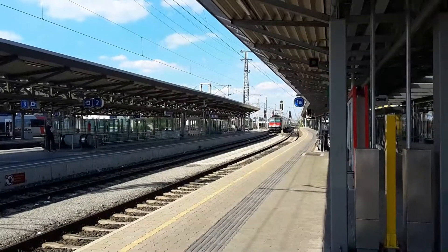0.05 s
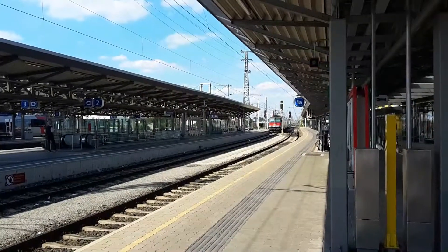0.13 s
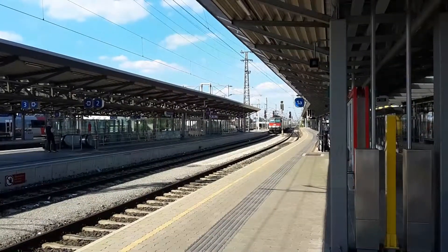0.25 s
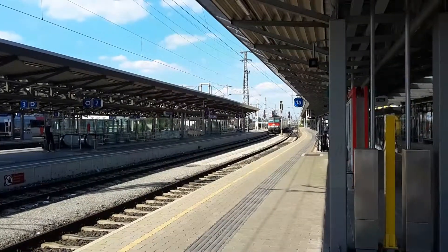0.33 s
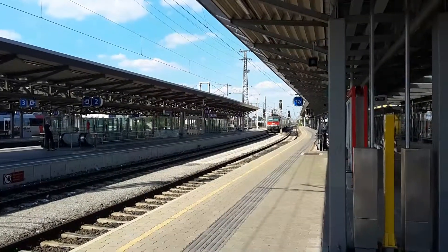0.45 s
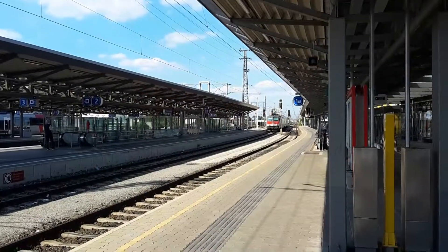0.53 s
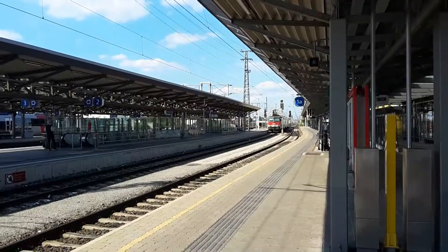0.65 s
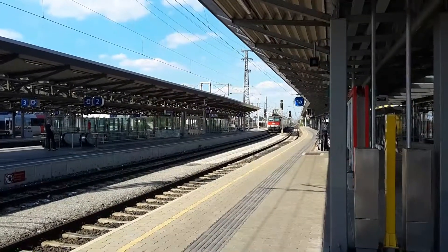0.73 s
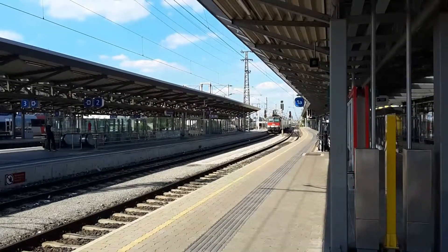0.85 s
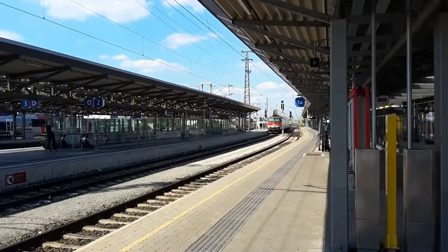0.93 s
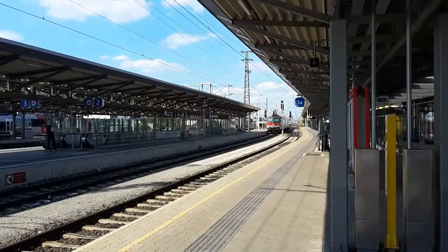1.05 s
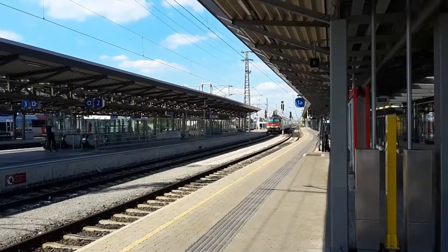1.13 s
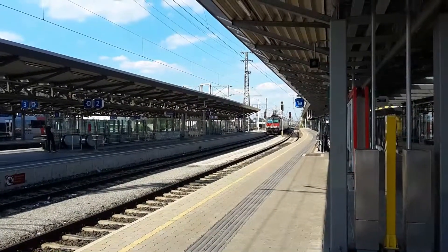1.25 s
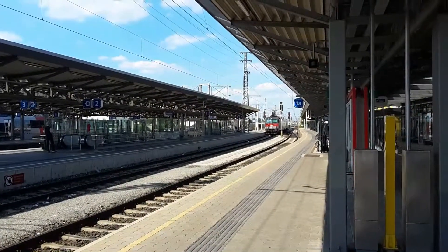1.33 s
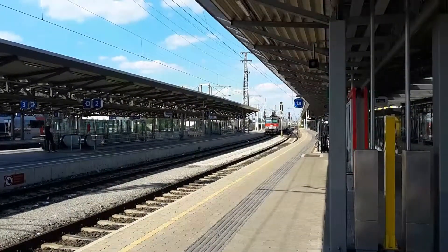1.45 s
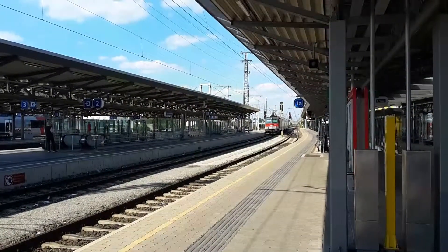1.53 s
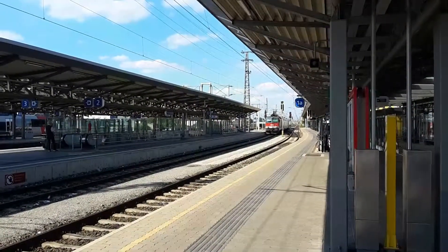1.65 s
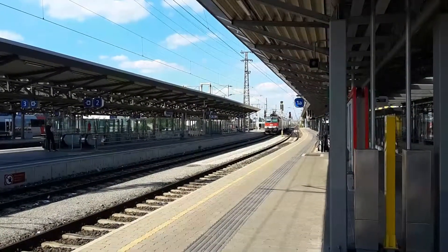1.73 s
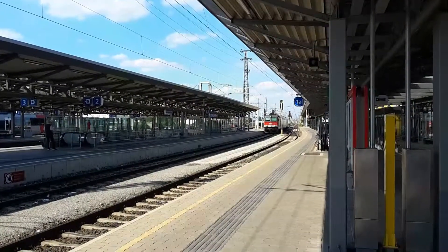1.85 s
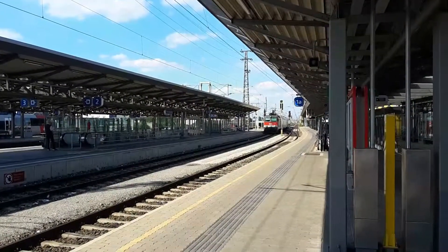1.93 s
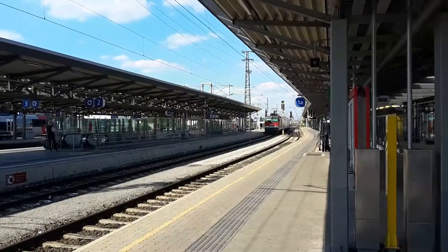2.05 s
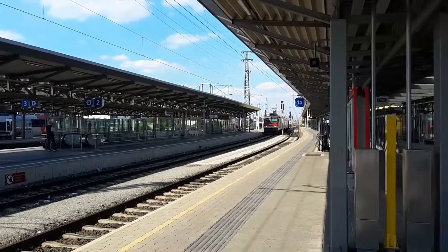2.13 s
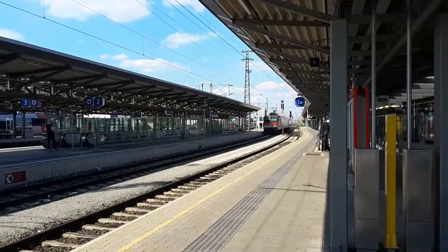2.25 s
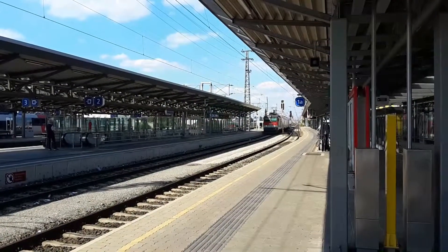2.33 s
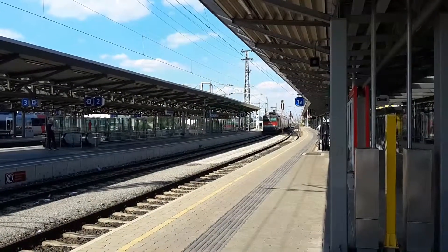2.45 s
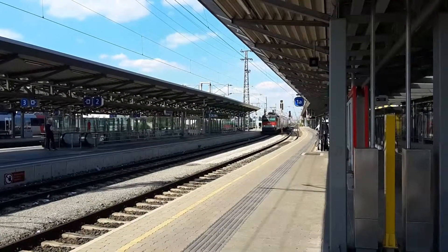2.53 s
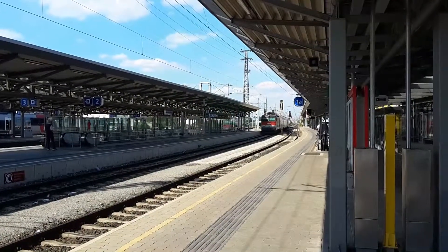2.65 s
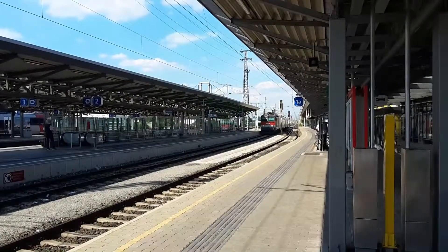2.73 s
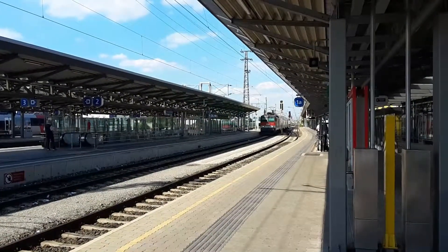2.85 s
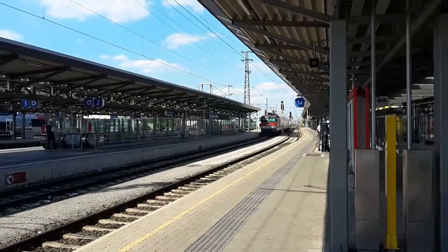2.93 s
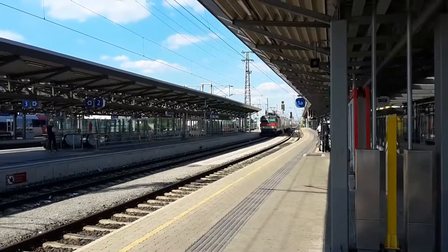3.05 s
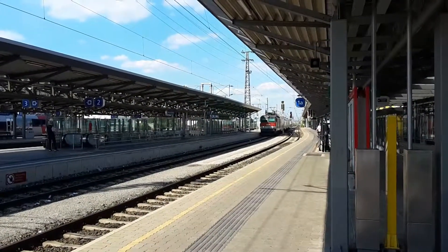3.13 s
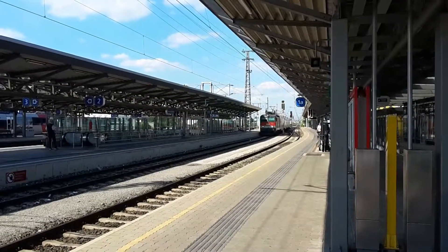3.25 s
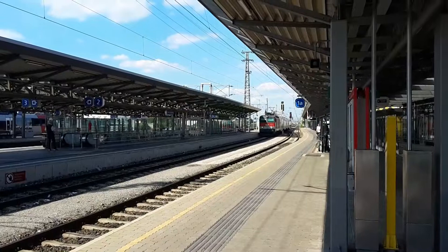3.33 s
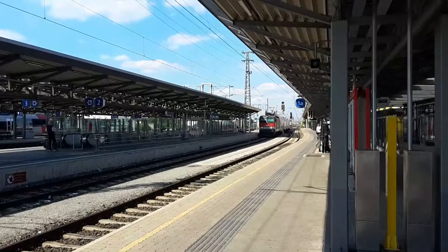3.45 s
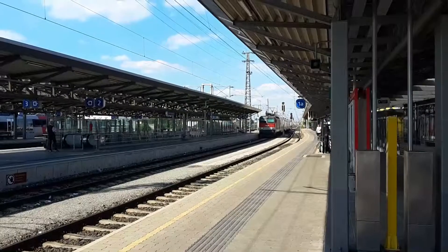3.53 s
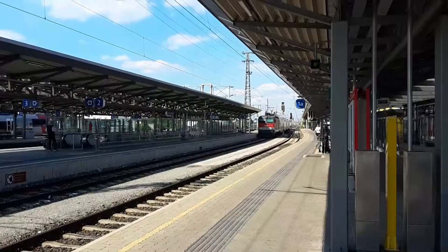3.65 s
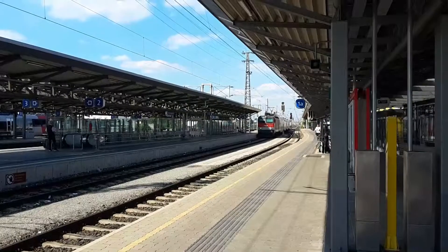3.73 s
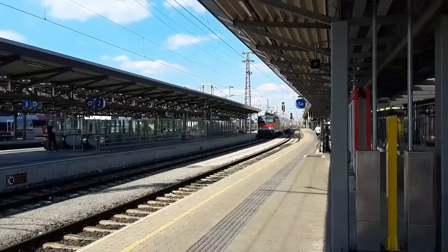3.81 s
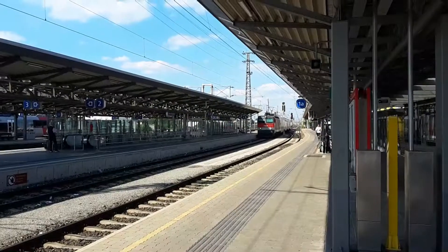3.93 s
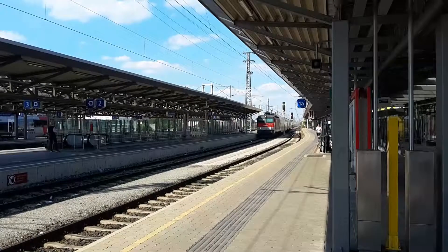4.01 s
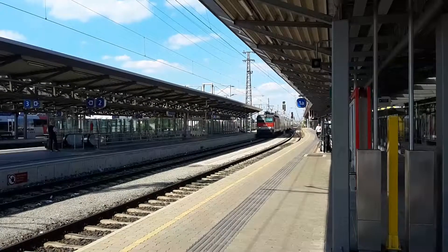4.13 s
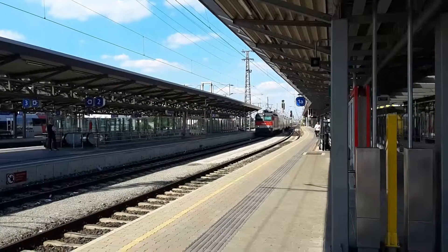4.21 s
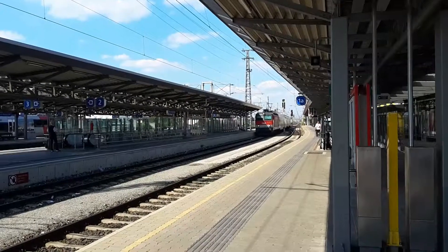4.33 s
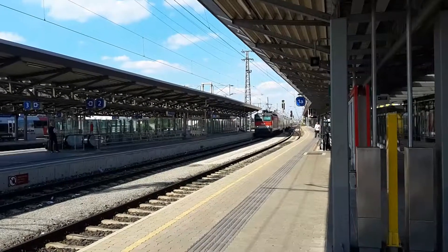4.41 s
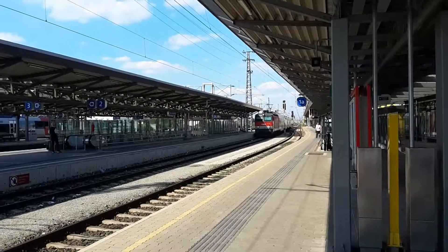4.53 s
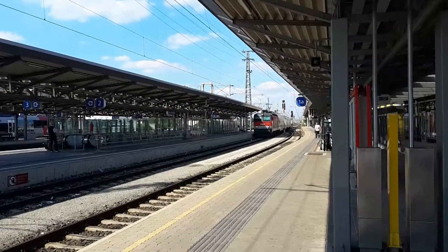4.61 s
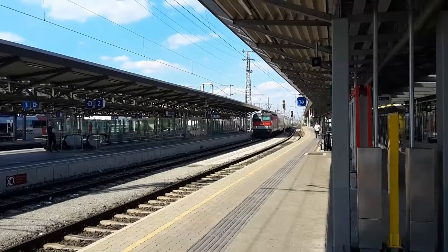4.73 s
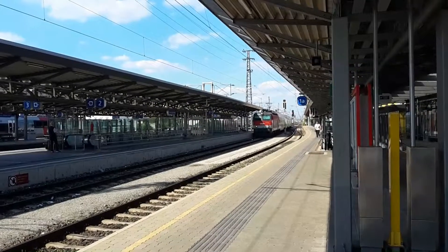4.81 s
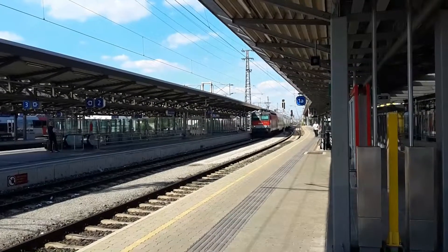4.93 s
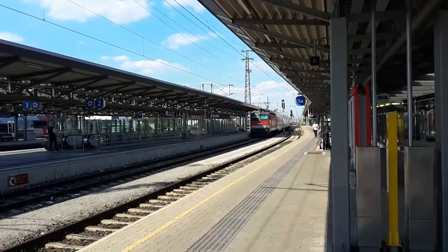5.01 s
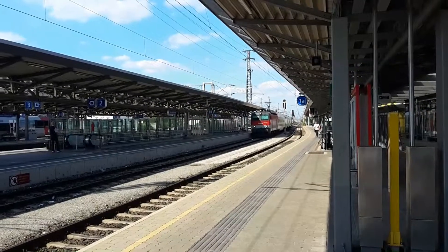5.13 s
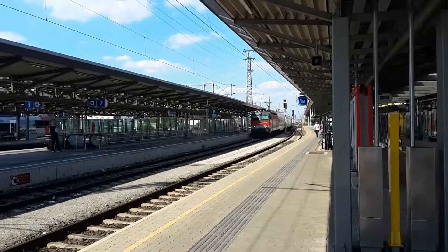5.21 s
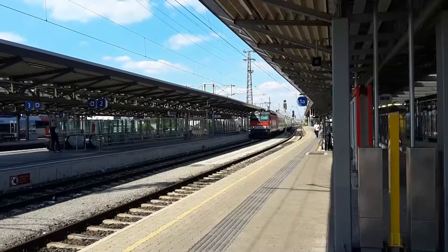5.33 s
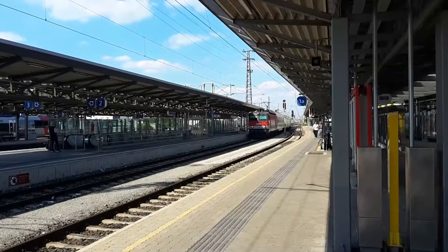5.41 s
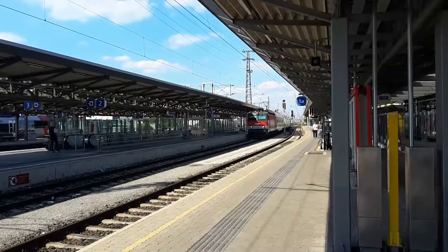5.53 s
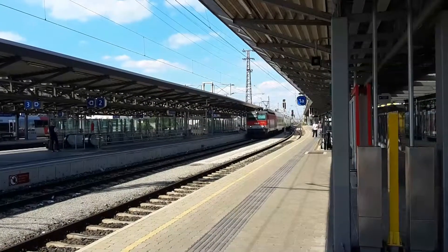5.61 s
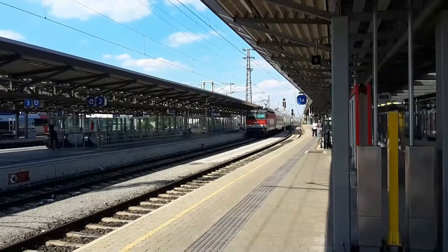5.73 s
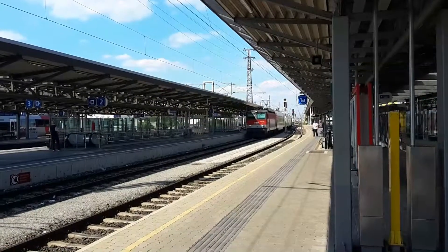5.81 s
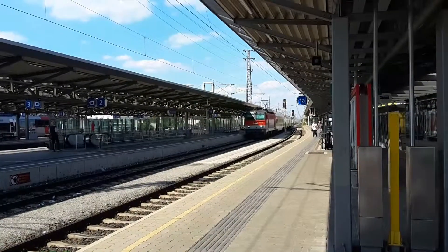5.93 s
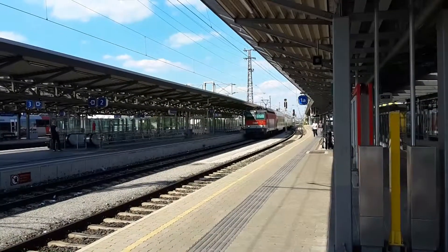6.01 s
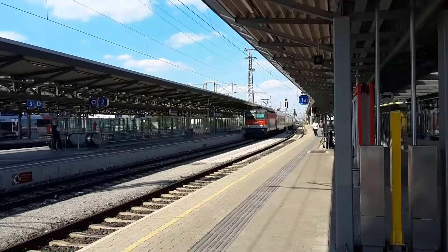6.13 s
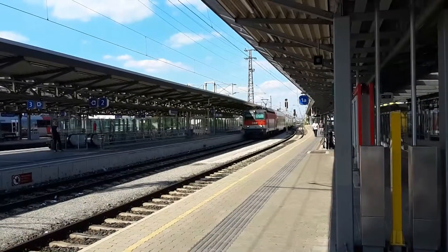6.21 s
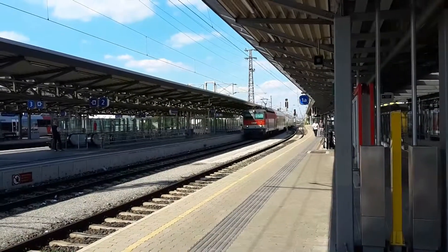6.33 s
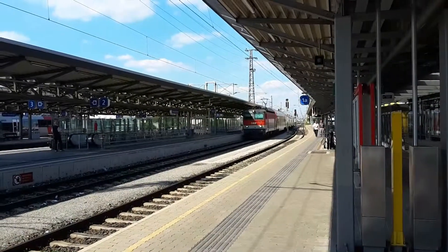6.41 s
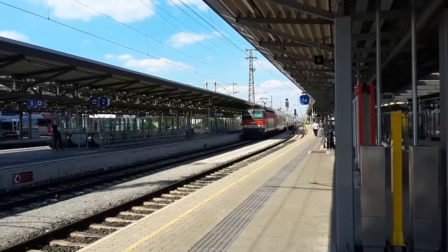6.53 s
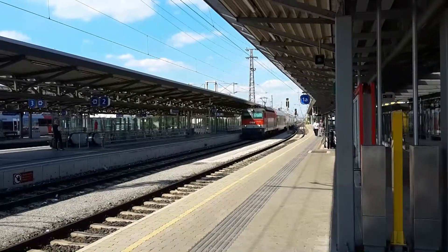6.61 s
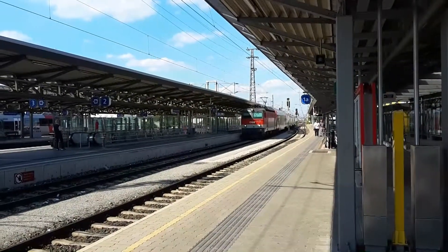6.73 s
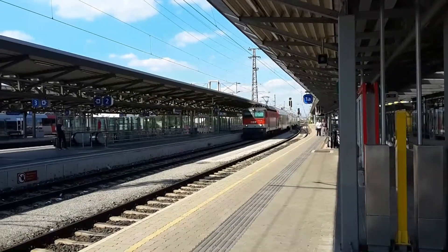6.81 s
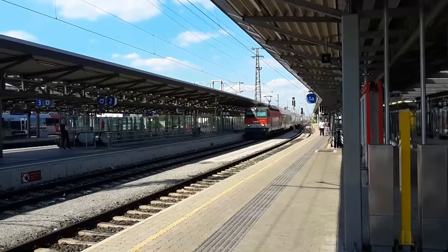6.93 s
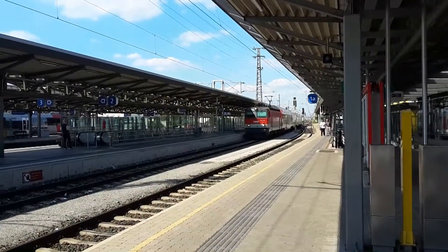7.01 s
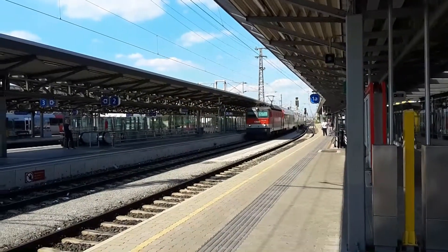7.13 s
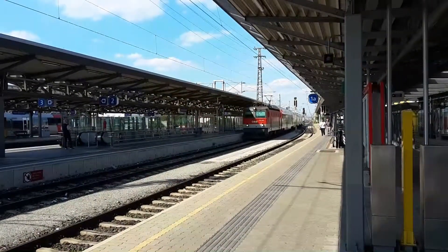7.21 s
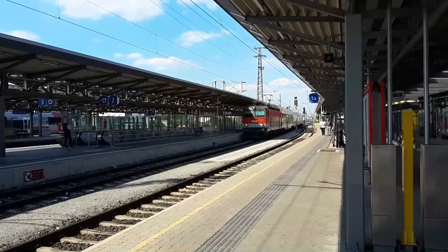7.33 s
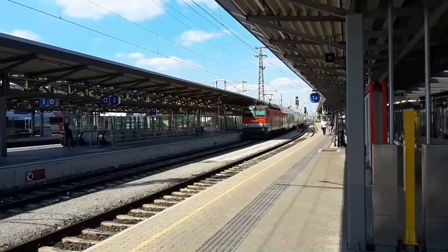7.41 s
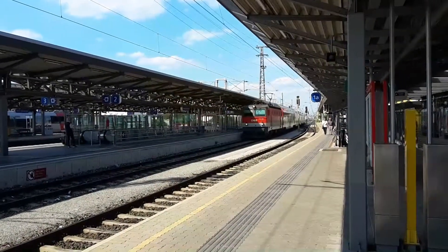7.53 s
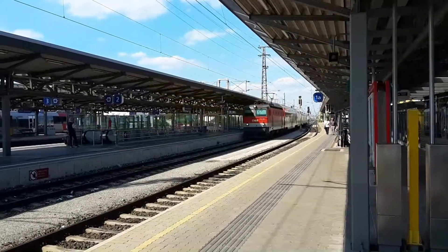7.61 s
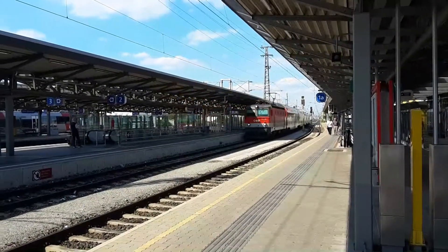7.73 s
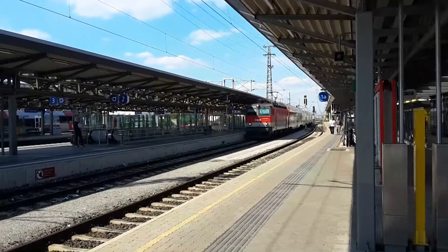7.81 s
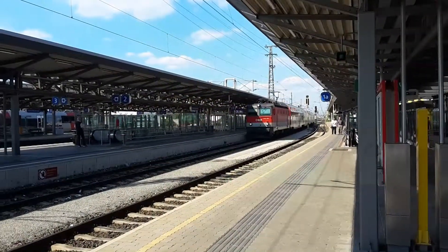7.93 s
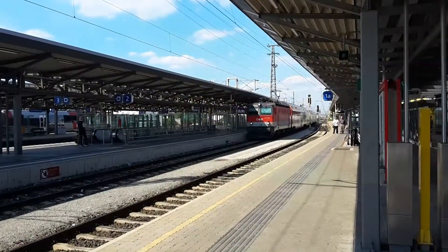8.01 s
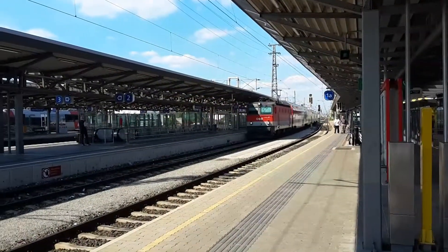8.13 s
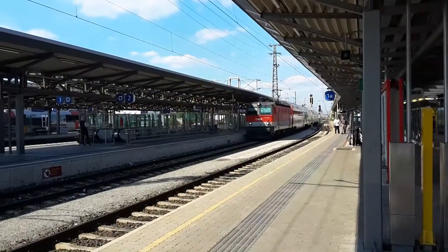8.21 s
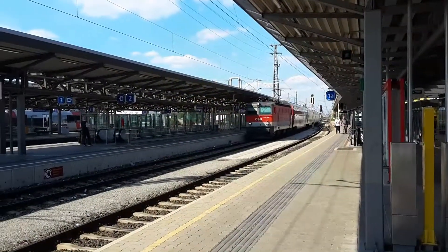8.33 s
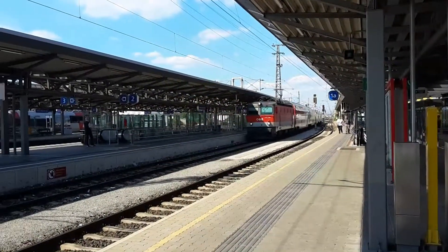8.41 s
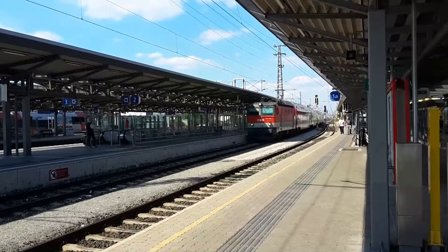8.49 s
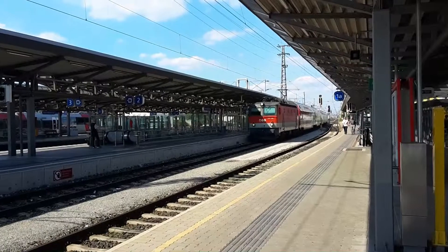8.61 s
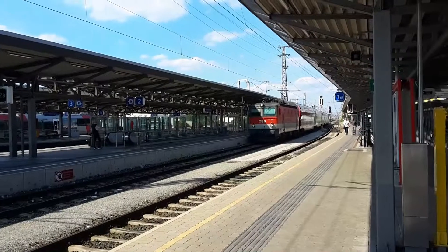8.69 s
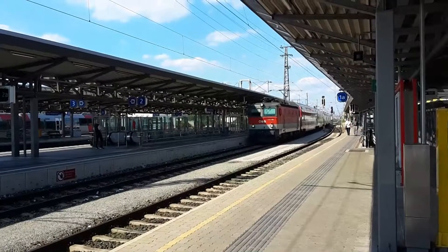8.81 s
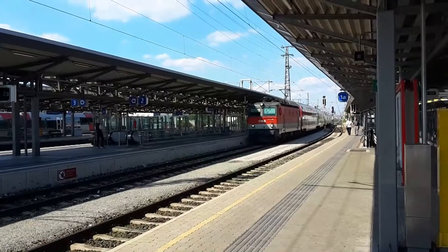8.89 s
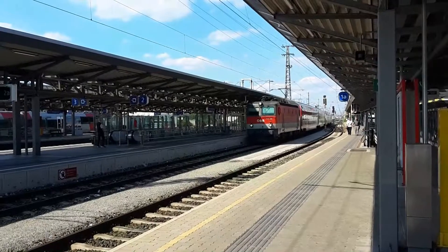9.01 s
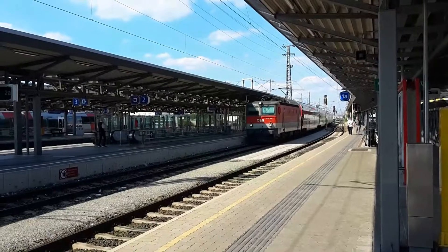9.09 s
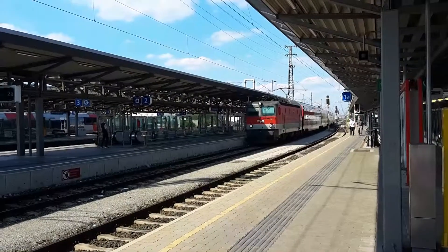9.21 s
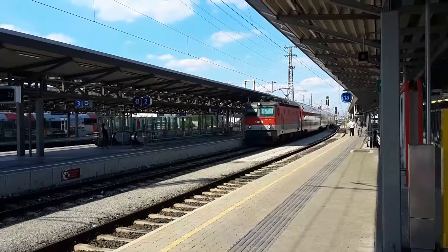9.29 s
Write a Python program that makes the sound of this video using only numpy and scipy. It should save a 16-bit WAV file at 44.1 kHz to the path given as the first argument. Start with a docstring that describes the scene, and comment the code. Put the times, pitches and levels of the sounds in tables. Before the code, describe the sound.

A braking electric train rolls towards an open station platform, its wavering mid-pitched whine and low rumble swelling, with a wind thump on the microphone midway.

```python
"""An electric locomotive with coaches brakes gently as it rolls towards a roofed station platform.
From the start its blower, a fluctuating blade tone with reflections, whines over a gear hum that sinks with speed.
Filtered noise gives rumble, wheel roar and rail hiss, growing overall as the train nears; the level dips early.
Halfway, a gust of short pressure pulses and low noise buffets the left microphone port.
The whine and rolling noise then grow stronger, and near the end the level dips again, now with a tick."""
import sys
import numpy as np
from scipy import signal
from scipy.fft import rfft, irfft, next_fast_len
from scipy.io import wavfile
from scipy.ndimage import uniform_filter1d

SR = 44100
rng = np.random.default_rng(int(sys.argv[2]) if len(sys.argv) > 2 else 0)


def unload_wav(signal):
    """Save mono or channel-first audio to the path in sys.argv[1] as 16-bit WAV at rate SR, clipped to [-1, 1]."""
    wavfile.write(
        sys.argv[1],
        SR,
        np.round(np.clip(np.atleast_2d(signal).T, -1, 1) * 32767).astype(np.int16),
    )


N = 412776

# Blower: time_s, pitch_hz, share scattered by the roofs (0-1), level_db of the hum an octave below
BLOWER = [(0, 641, 0.15, -60), (2.5, 636, 0.03, -56.5), (2.95, 638.5, 0.01, -43), (3.9, 637, 0.05, -43.5),
          (4.25, 637, 0.17, -52), (4.65, 633, 0.47, -50), (5.1, 634.5, 0.1, -55), (5.75, 637, 0.2, -55.5),
          (6.1, 632, 0.3, -51.5), (6.4, 636, .1, -51), (6.78, 631, 0.07, -47), (7.35, 635.5, 0.01, -48.5),
          (7.9, 631, 0.16, -53), (8.4, 631, 0.2, -50), (9.36, 634, 0.16, -52)]
# Blower whine, fading and beating between the platform roofs: time_s, level_db before a small trim
WHINE = [(0, -41), (.17, -34.5), (.47, -40), (.57, -46), (.7, -49), (.8, -37), (.97, -37), (1.09, -49),
         (1.2, -38), (1.48, -37), (1.75, -46), (1.9, -36.5), (2.08, -32.5), (2.17, -38.5), (2.27, -31),
         (2.4, -40.5), (2.55, -30.5), (2.69, -40), (2.77, -33), (3.29, -32), (3.35, -42.5), (3.46, -44.5),
         (3.57, -32), (3.67, -33), (3.8, -36), (3.84, -27.5), (3.92, -27), (4.04, -40.5), (4.11, -39.5),
         (4.15, -30.5), (4.23, -35), (4.41, -45), (4.46, -36), (4.51, -51), (4.61, -29.5), (4.7, -47),
         (4.74, -32), (4.77, -52), (4.82, -37), (4.9, -46), (4.94, -35), (5.03, -31), (5.09, -41),
         (5.16, -30), (5.21, -34.5), (5.35, -36), (5.5, -40), (5.84, -33), (5.92, -31.5), (5.97, -30.5),
         (6.11, -43.5), (6.16, -30.5), (6.23, -42), (6.29, -30.5), (6.43, -31.5), (6.59, -26.5),
         (6.69, -33.5), (6.79, -26.5), (6.92, -37), (7.0, -34.5), (7.09, -30), (7.16, -31.5), (7.22, -32.5),
         (7.27, -29.5), (7.34, -23.5), (7.43, -35.5), (7.58, -27), (7.64, -41), (7.73, -33.5), (7.8, -27),
         (7.97, -38), (8.03, -26), (8.11, -35), (8.17, -31.5), (8.31, -30), (8.41, -24), (8.46, -30),
         (8.53, -41), (8.58, -25.5), (8.65, -33.5), (8.71, -31), (8.76, -37), (8.81, -27.5), (8.86, -37),
         (8.9, -21), (8.96, -27.5), (8.99, -34), (9.03, -28), (9.1, -22), (9.15, -27), (9.2, -26.5),
         (9.25, -30), (9.32, -25.5), (9.36, -23)]
# Gear mesh: time_s, pitch_hz, fundamental_db, octave_db
GEARS = [(0, 238.5, -41, -57), (1, 231.2, -43.5, -66.5), (2, 222.1, -40.5, -56), (3.3, 214.1, -47, -54.5),
         (3.8, 211.5, -38.5, -52), (4.2, 208, -36, -56), (5, 202.1, -41, -48), (5.55, 195, -47, -41.5),
         (6, 188.4, -39, -49.5), (6.8, 178.2, -38.5, -42), (7.4, 174.1, -33, -47.5),
         (7.95, 167.8, -40.5, -51.5), (8.3, 164, -31.5, -35.5), (8.52, 160.4, -38, -40.5),
         (8.72, 158.9, -30.5, -28.5), (9.0, 156, -32, -29), (9.36, 153.6, -31.5, -31.5)]
# Weaker whine sinking below the blower, as of a fan running down: time_s, pitch_hz, level_db
FAN = [(0, 635, -70.5), (4, 613.5, -49), (5.3, 612, -42), (5.8, 603, -47), (6.4, 598.6, -46.5),
       (7, 585.6, -47.5), (7.55, 579, -40.5), (7.9, 574.4, -47), (8.3, 564, -40.5), (8.9, 555, -46),
       (9.36, 550, -46)]
# Ground rumble level: time_s, level_db
GROUND_LEVEL = [(0, -47.5), (1.5, -45), (2.7, -46.5), (4.0, -44.5), (5.2, -40.5), (6.1, -43), (7.25, -41),
                (7.8, -39), (8.25, -35.5), (9.0, -36.5), (9.36, -41)]
# Wheels and bodywork ringing in the curve: start_s, end_s, pitch_hz, width_hz, level_db
RINGING = [(0.34, 2.2, 237, 5, -42.5), (0.95, 2.5, 178.6, 8.8, -41), (1.06, 2.4, 92.9, 8.4, -48.5),
           (2.6, 3.9, 146, 14, -43), (2.048, 3.94, 1013, 26, -51), (5.1, 6.9, 358, 30, -44),
           (5.152, 6.05, 232.8, 6.2, -36), (5.6, 8.2, 135.6, 17, -45.5), (6.1, 8.4, 323.9, 24, -41)]

# Noise spectra, shape only, since each noise is scaled to unit level: frequency_hz, relative_density_db
# Ground rumble: frequency_hz, relative_density_db
RUMBLE_SPECTRUM = [(15, -37.5), (28, -30), (40, -17), (52, -1.5), (64, -2.5), (80, -1), (100, 1), (120, 1),
                   (150, -4.5), (300, -79.5), (1000, -79.5)]
# Coach bodies: frequency_hz, relative_density_db
BOOM_SPECTRUM = [(30, -36.5), (70, -26.5), (115, -17.5), (150, -1), (180, 2.5), (210, -0.5), (236, 1),
                 (262, -10), (310, -12.5), (450, -31), (900, -105.5)]
# Sleepers: frequency_hz, relative_density_db
DRONE_SPECTRUM = [(150, -20), (270, 3.5), (340, 7.5), (410, 4.5), (490, 3.5), (570, 4.5), (660, 6),
                  (740, -10), (1200, -47), (3000, -72)]
# Wheels: frequency_hz, relative_density_db
ROAR_SPECTRUM = [(400, -28.5), (600, 1.5), (720, 1.5), (850, -0.5), (1000, -3), (1350, -4), (1700, -10.5),
                 (2500, -23.5), (5000, -83)]
# Rails: frequency_hz, relative_density_db
HISS_SPECTRUM = [(700, -25), (1500, -3.5), (1900, 0.5), (2400, 0), (3000, -5), (3900, -13.5), (5000, -25),
                 (6300, -43.5), (8000, -71), (15000, -87)]
# Top of the rail hiss: frequency_hz, relative_density_db
SIZZLE_SPECTRUM = [(2500, -13), (3900, 10.5), (5000, -1), (6300, -9.5), (7200, -20), (8500, -36),
                   (15000, -49.5)]
# Faint background hiss: frequency_hz, relative_density_db
AIR_SPECTRUM = [(20, -9.5), (4000, -10), (5700, 5), (8000, -16), (10200, 21), (14000, 16), (15000, -14)]

# Coach body level: start_db, rise_db per halving of distance
BOOM_LEVEL = (-37, 6.3)
# Sleeper level: start_db, rise_db per halving of distance
DRONE_LEVEL = (-43.5, 10.4)
# Wheel level: start_db, rise_db per halving of distance
ROAR_LEVEL = (-44, 9.35)
# Rail level: start_db, rise_db per halving of distance
HISS_LEVEL = (-52.5, 6.9)
# Top of the rail hiss, level: start_db, rise_db per halving of distance
SIZZLE_LEVEL = (-86, 22.3)

# Eddies on the left port: time_s, peak_db before the port filter, swing_s, swing_back_s, push 1 or pull -1
EDDIES = [(4.3499, -12, .0036, .0065, -1), (4.3803, -14, .0041, .0049, -1), (4.4112, -18, .004, .007, -1),
          (4.4515, -18, .0045, .0058, -1), (4.4926, -19.5, .004, .0058, -1),
          (4.5458, -20.5, .0042, .006, -1), (4.6359, -21.5, .0045, .008, -1),
          (4.6932, -1.0, .00155, .0033, 1), (4.7105, -24, .006, .004, -1), (4.8319, -21, .0037, .0058, -1),
          (4.847, -9.5, .0035, .003, 1)]
# Sharp suction opening the strongest eddy: time_s, peak_db before the port filter, width_s
CRACK = (4.69192, -2.0, .0004)
# Brief level dips, the second with an audible tick: time_s, recovery_s, tick_db before the treble cut
DIPS = [(1.052, 0.02, -70), (9.052, 0.015, -17.5)]
# Likeness of the microphone pair: frequency_hz, left-right correlation (-1 to 1)
LIKENESS = [(60, .97), (200, .99), (350, .97), (480, .88), (700, .88), (1050, .6), (1400, .15), (1700, -.1),
            (2400, .18), (3000, .05), (6000, .1)]
# Balance of the microphone pair: frequency_hz, left_minus_right_db
BALANCE = [(60, -1.5), (400, 0.5), (900, -0.2), (1250, -1), (1900, -1.5), (2400, -3), (3100, -7.5),
           (4400, -5.5), (5400, 2.5), (6400, 5), (9000, -4.5)]

START_DISTANCE_M, START_SPEED_M_PER_S = 197, 14.6  # the gear pitch tells how the speed falls
# The far platform screens wheels and coach bodies until the train rounds the curve
IN_VIEW_S, SCREEN_DB, EMERGE_S = 2.09, -2.0, 0.15
GEAR_ECHO_PER_HALVING = .15  # growth of the gear hum's roof reflections, relative to the direct tone
GUST_START_S, GUST_DB, GUST_FALL_DB_PER_S = 4.33, -35, 24
PORT_HZ = 3700  # the narrow microphone port dulls wind above this
CUTOFF_HZ = 16500  # stopband edge of the final treble cut


def blower(level_db=-0.26, octave_db=-20.0, doppler_loss_hz=9.0, width_hz=6.5, apart=.35):
    """Doppler effect: slanting reflections of the blade tone carry less pitch rise than the direct path."""
    hz, share, hum_db = in_time(BLOWER)
    share = np.clip(share, 0, 1)
    whine_db, = in_time(WHINE)
    direct_phase = phase_of(hz)
    echo_phase = phase_of(hz - doppler_loss_hz)

    direct = np.sqrt(2 * (1 - share)) * np.sin(direct_phase)
    tone = direct + np.sqrt(share) * scattered(echo_phase, width_hz)
    # Even out the level over 25 ms, so that the whine table sets the beats
    tone /= np.sqrt(uniform_filter1d(tone ** 2, size=1100) + .02)
    sideways = apart * np.sqrt(share) * scattered(echo_phase, width_hz) * np.array([[1], [-1]])

    octave_gain = from_db(octave_db) * np.sqrt(2 * share + 0.45)
    octave = octave_gain * scattered_pair(2 * direct_phase, width_hz=7.2, apart=1.0) * pan(3.9)
    whine = (tone + sideways) * pan(-1.3) + octave
    hum = from_db(hum_db) * np.sqrt(2) * np.sin(direct_phase / 2)
    return from_db(whine_db + level_db) * whine + hum


def gears(echo_share=.15, width_hz=7.0):
    """Tooth meshing: pitch and its octave follow speed; reflections roughen them as the train nears."""
    hz, first_db, octave_db = in_time(GEARS)
    phase = phase_of(hz)
    echoes = echo_share + GEAR_ECHO_PER_HALVING * halvings()
    out = 0
    for harmonic, level_db in enumerate((first_db, octave_db), 1):
        direct = np.sqrt(2) * np.sin(harmonic * phase)
        tone = direct + echoes * scattered_pair(harmonic * phase, width_hz, apart=0.14)
        out = out + from_db(level_db) * tone / np.sqrt(1 + echoes ** 2)
    return out * pan(-.5)


def running_gear(uneven_db=0.5, uneven_hz=24.0, sway_db=0.5, sway_hz=1.8):
    """Roughness excitation: wheel and rail shake ground, coach bodies, sleepers, wheels and rails."""
    ground_db, = in_time(GROUND_LEVEL)
    roughness_db = uneven_db * drift(uneven_hz)
    sway = sway_db * drift(sway_hz)
    screened_db = SCREEN_DB * np.clip(.5 + (IN_VIEW_S - np.arange(N) / SR) / EMERGE_S, 0, 1)

    rumble = from_db(ground_db) * diffuse_noise(RUMBLE_SPECTRUM)
    boom = approaching(BOOM_LEVEL) * from_db(sway + screened_db) * diffuse_noise(BOOM_SPECTRUM)
    drone = approaching(DRONE_LEVEL) * diffuse_noise(DRONE_SPECTRUM)
    roar = approaching(ROAR_LEVEL) * from_db(roughness_db + screened_db) * diffuse_noise(ROAR_SPECTRUM)
    hiss = approaching(HISS_LEVEL) * from_db(.5 * roughness_db) * diffuse_noise(HISS_SPECTRUM)
    return rumble + boom + drone + roar + hiss


def sizzle():
    """Atmospheric absorption: air soaks up the top of the rail hiss, so it grows fastest on approach."""
    return approaching(SIZZLE_LEVEL) * diffuse_noise(SIZZLE_SPECTRUM)


def wheel_throb(mesh_ratio=0.375, level_db=-5.0, width_hz=6.4):
    """Periodic excitation: slightly out-of-round wheels give a low throb that sinks with the speed."""
    phase = phase_of(mesh_ratio * in_time(GEARS)[0])
    gain = from_db(in_time(GROUND_LEVEL)[0] + level_db)  # relative to the ground rumble
    return gain * scattered_pair(phase, width_hz, apart=0.16) * pan(-0.51)


def ringing(fade_s=0.21):
    """Resonance: narrow bands, shaken by the rolling, swell and fade."""
    t, out = np.arange(N) / SR, 0
    for start, end, hz, width_hz, level_db in RINGING:
        swell = np.clip(np.minimum(t - start, end - t) / fade_s, 0, 1)
        alike = np.clip(at_hz(LIKENESS, hz), 0, 1)
        apart = np.sqrt((1 - alike) / (1 + alike))  # gives the pair this correlation
        out = out + from_db(level_db) * swell * scattered_pair(2 * np.pi * hz * t, width_hz, apart)
    return out


def slowing_fan(echoes=0.99, width_hz=4.8):
    """Multipath propagation: reflections roughen a thin sinking tone."""
    hz, level_db = in_time(FAN)
    phase = phase_of(hz)
    tone = np.sqrt(2) * np.sin(phase) + echoes * scattered_pair(phase, width_hz, apart=0.38)
    return from_db(level_db) * rms_one(tone)


def gust():
    """Eddy pressure: each eddy swings the left diaphragm out and back, a short thud; one adds a crack."""
    t, out = np.arange(N) / SR, np.zeros(N)
    for s, peak_db, swing, swing_back, direction in EDDIES:
        u = np.clip((t - s) / np.where(t < s, swing, swing_back), -5, 5)
        out += np.sign(direction) * from_db(peak_db) * np.cos(np.pi * u) * np.exp(-(u / 1.08) ** 2)
    s, peak_db, width = CRACK
    out -= from_db(peak_db) * np.exp(-np.minimum(np.abs(t - s) / width, 20))
    out = signal.sosfilt(signal.butter(8, PORT_HZ, fs=SR, output="sos"), out)
    return np.array([out, np.zeros(N)])


def turbulence(low_hz=50.0, high_hz=170.0, attack_s=.01):
    """Turbulent pressure: low noise on the left port sets in quickly with the gust and dies away."""
    age = np.maximum(np.arange(N) / SR - GUST_START_S, 0)
    band = signal.butter(2, [low_hz, high_hz], "band", fs=SR, output="sos")
    flutter = signal.sosfilt(band, rng.standard_normal(N))
    level = np.minimum(age / attack_s, 1) * from_db(GUST_DB - GUST_FALL_DB_PER_S * age)
    return np.array([level * rms_one(flutter), np.zeros(N)])


def air(level_db=-78.5, slope_db_per_s=-0.9):
    """Broadband noise: a faint high hiss on a gently sloping level."""
    level = from_db(level_db + slope_db_per_s * np.arange(N) / SR)
    return level * diffuse_noise(AIR_SPECTRUM)


def halvings():
    """Kinematics: speed, proportional to gear pitch, gives how often the distance has halved."""
    mesh_hz = in_time(GEARS)[0]
    travelled_m = np.cumsum(START_SPEED_M_PER_S * mesh_hz / mesh_hz[0]) / SR
    return np.log2(START_DISTANCE_M / np.maximum(START_DISTANCE_M - travelled_m, 10))


def approaching(level):
    """Distance law: the level rises by a fixed number of decibels per halving of distance."""
    start_db, rise_db = level
    return from_db(start_db + rise_db * halvings())


def diffuse_noise(spectrum):
    """Diffuse field: sound from all round is alike at both ports in the bass, less so in the treble."""
    size = next_fast_len(N)
    hz = np.arange(size // 2 + 1) * SR / size
    top_hz = spectrum[-1][0]
    roll_off = (top_hz / np.maximum(hz, top_hz)) ** 2  # above the last point
    colour = from_db(at_hz(spectrum, hz)) * roll_off
    mid, side = rfft(rng.standard_normal((2, size)))
    alike = np.clip(at_hz(LIKENESS, hz), -.995, .995)
    pair = np.sqrt(1 + alike) * mid + np.sqrt(1 - alike) * side * [[1], [-1]]
    sound = irfft(pair * colour * pan(at_hz(BALANCE, hz)), size)[:, :N]
    return sound / np.std(sound.mean(axis=0))


def scattered(phase, width_hz):
    """Multipath scattering: many changing paths widen a tone's line into a narrow band."""
    return drift(width_hz) * np.cos(phase) + drift(width_hz) * np.sin(phase)


def scattered_pair(phase, width_hz, apart):
    """Partial coherence: a shared scattered tone plus an opposed one makes the two ports differ."""
    shared = scattered(phase, width_hz)
    opposed = scattered(phase, width_hz) * np.array([[1], [-1]])
    return rms_one(shared + apart * opposed)


def drift(rate_hz):
    """Low-pass filtered noise: slow random motion of unit power."""
    step = 40  # samples between computed points
    r = np.exp(-2 * step * np.pi * rate_hz / SR)
    noise = rng.standard_normal(N // step + 2002)
    slow = signal.lfilter([1], [1, -2 * r, r * r], noise)[2000:]  # drop the settling
    return np.interp(np.arange(N) / step, np.arange(len(slow)), rms_one(slow))


def phase_of(hz):
    """Phase is the running integral of angular frequency."""
    return 2 * np.pi * np.cumsum(hz) / SR


def pan(db):
    """Interaural level difference: half the decibels go to each side, with opposite sign."""
    return from_db(np.array([[.5], [-.5]]) * db)


def from_db(db):
    """Logarithmic level: twenty decibels are a tenfold amplitude."""
    return 10 ** (np.asarray(db) / 20)


def rms_one(x):
    """Mean-square normalisation: scale to unit power."""
    return x / np.sqrt(np.mean(np.abs(x) ** 2) + 1e-20)


def in_time(rows):
    """Linear interpolation: each column of a time table at every sample."""
    s, *columns = np.transpose(rows)
    return [np.interp(np.arange(N) / SR, s, c) for c in columns]


def at_hz(points, hz):
    """Logarithmic pitch scale: read a spectrum by interpolating over log frequency."""
    known_hz, values = np.transpose(points)
    return np.interp(np.log(hz + 1e-9), np.log(known_hz), values)


def scene():
    """Superposition: the pressures of the train, the gust and a faint hiss add."""
    train = blower() + gears() + running_gear() + sizzle() + wheel_throb() + ringing() + slowing_fan()
    return train + gust() + turbulence() + air()


def dips(x, fall_s=0.00069):
    """Amplitude modulation: the level drops to nothing, the second time with a tick, and climbs back."""
    t = np.arange(N) / SR
    for s, recovery, tick_db in DIPS:
        away = np.clip(np.maximum((s - t) / fall_s, (t - s) / recovery), 0, 1)
        gain = np.sin(np.pi / 2 * away) ** 2
        tick = from_db(tick_db) * np.exp(-np.abs(t - s) / .00005)  # too faint to hear at the first dip
        x = x * gain + tick
    return x


def record(dry, low_cut_hz=28.0):
    """Band limiting: after a 2 ms fade-in the deepest bass is cut, the level dips and the top is cut."""
    fade_in = np.sin(np.pi / 2 * np.minimum(np.arange(N) / 100, 1)) ** 2
    bass_cut = signal.butter(2, low_cut_hz, "high", fs=SR, output="sos")
    lean = signal.sosfilt(bass_cut, dry * fade_in)
    treble_cut = signal.cheby2(12, 70, CUTOFF_HZ, fs=SR, output="sos")
    return signal.sosfilt(treble_cut, dips(lean))


dry = scene()
out = record(dry)
unload_wav(out)
```